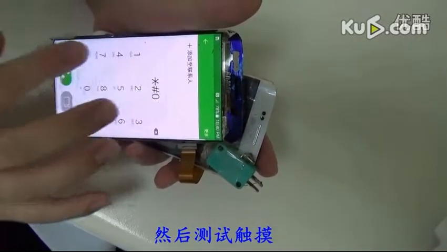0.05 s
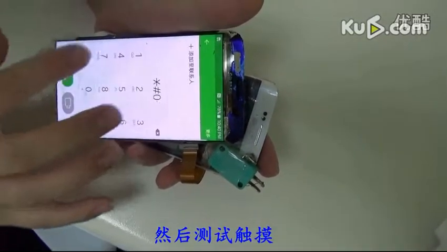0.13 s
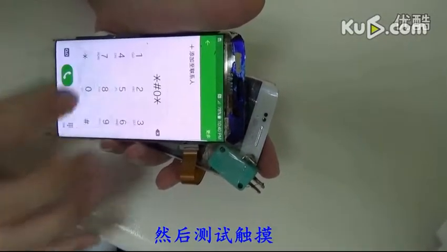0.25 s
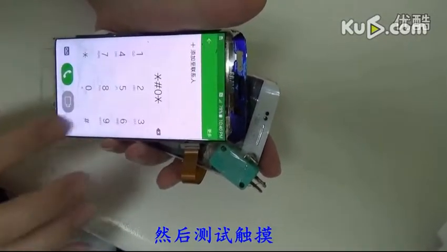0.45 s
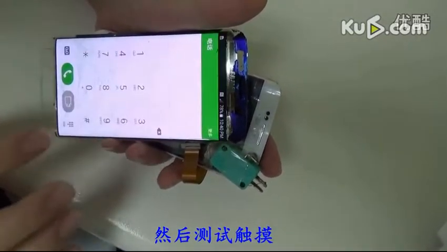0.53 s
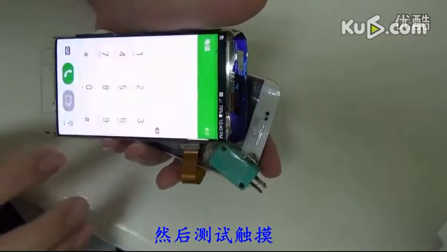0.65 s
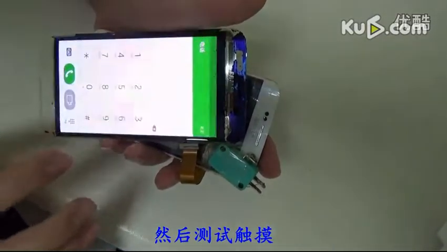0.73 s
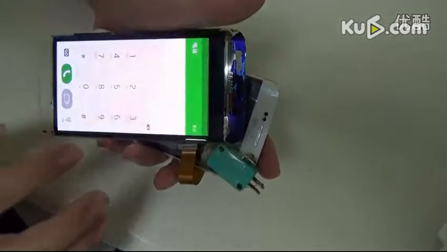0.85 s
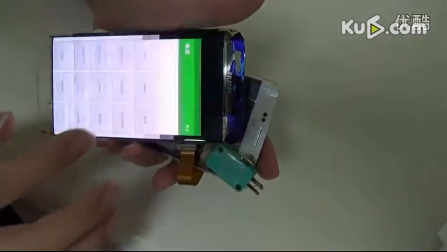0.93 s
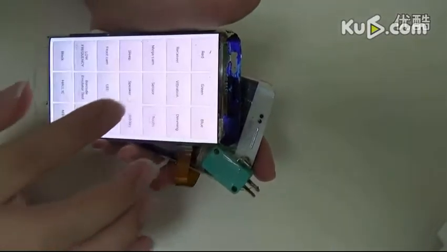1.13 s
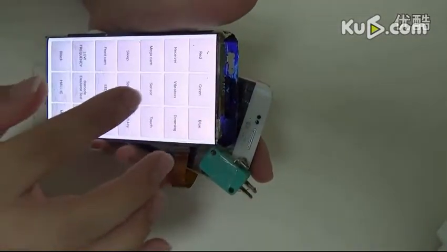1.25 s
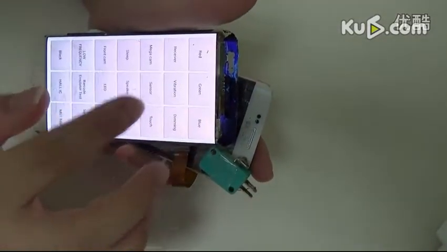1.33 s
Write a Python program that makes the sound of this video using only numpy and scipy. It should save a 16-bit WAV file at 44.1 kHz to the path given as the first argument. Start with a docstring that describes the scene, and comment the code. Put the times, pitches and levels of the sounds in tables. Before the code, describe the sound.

Fingers tap a phone, with a hard knock in a small room over low hiss.

```python
"""Low room noise and hiss run from the start, and now and then skin brushes faintly over a loose phone.
Fingers tap the phone close to the microphone in a small bare room. A light click follows, then a hard
knock and a softer one as the phone rocks and settles. Each contact cracks, shakes the casing, thuds and
leaves the room ringing. After a last tiny tick, the room noise slowly fades."""
import sys
import numpy as np
from scipy import signal
from scipy.fft import rfft, irfft, next_fast_len
from scipy.io import wavfile
from scipy.ndimage import map_coordinates

SR = 44100
rng = np.random.default_rng(int(sys.argv[2]) if len(sys.argv) > 2 else 0)


def wrap_up_sound(samples):
    """Save the sound to the file named by the first command line argument, as 16-bit audio."""
    columns = np.atleast_2d(samples).T
    # keep every value between -1 and 1, then stretch to whole-number steps
    tamed = np.clip(columns, -1, 1)
    steps = np.round(tamed * 32767).astype(np.int16)
    wavfile.write(sys.argv[1], SR, steps)


N = 61739


def contacts():
    """Each contact cracks, rings the casing, thuds and fills the room; the hardest makes the room boom."""
    # Each row: start in seconds, snap in dB, crack in dB, its fade time in seconds, its tilt in dB per
    # octave, pitch in Hz above which it dulls, favoured casing pitch in Hz, focus on that pitch in dB,
    # casing life in seconds, casing in dB, thud in dB, room in dB, room tilt in dB per octave.
    hits = [(0.233, -22, -20, 0.025, 5, 15300, 1550, 23.5, 0.0096, -13, -19.5, -36, -2),
            (0.3207, -27, -23, 0.033, 3.5, 13000, 1520, 11, 0.0094, -25, -31, -41, -1),
            (.3870, 2, -13, 0.052, 0, 13700, 706, 1.5, 0.014, -13, -19.5, -20.5, 0),
            (0.4476, -10, -13.5, 0.027, 0.5, 8900, 1520, 1, 0.0046, -17.5, -37, -28.5, 1),
            (0.759, -58, -35.5, 0.025, 11.5, 20000, 1400, 6, .005, -54, -64, -55, 5)]
    out = np.zeros((2, N))
    for (start, snap_db, crack_db, fade_s, tilt_db, dull_hz,
         favoured_hz, focus_db, life_s, casing_db, thud_db, room_db, room_tilt_db) in hits:
        out += crack(start, snap_db, crack_db, fade_s, tilt_db, dull_hz)
        out += amp(casing_db) * casing(start, favoured_hz, focus_db, life_s)
        out += amp(thud_db) * thud(start)
        out += amp(room_db) * room(start, room_tilt_db)
    hardest_start = max(hits, key=lambda row: row[2])[0]
    return out + amp(-12) * boom(hardest_start)


def crack(start, snap_db, crack_db, fade_s, tilt_db, dull_hz):
    """Glass and plastic parts meet: one sharp snap, then a brief bright chatter."""
    # Each row: pitch in Hz, noise strength in dB.
    spectrum = [(200, -3), (700, 12), (1400, 2.5), (2200, 5), (3500, 5.5), (4800, 0.5), (6200, 1.5),
                (8000, 2.5), (10000, -2), (13000, -5), (15500, -18)]
    t = since(start)
    snap = amp(snap_db) * fade(t, 0.0022)
    chatter = amp(crack_db) * fade(t, fade_s, hold_s=0.00082)
    return noise(spectrum, tilt_db, dull_hz) * rise(t, 0.00031) * (snap + chatter)


def casing(start, favoured_hz, focus_db, life_s):
    """The casing rings briefly, then stops abruptly; the spot that is hit favours some of its tones."""
    # Each row: pitch in Hz, level in dB.
    tones = [(300, 3), (520, -10), (772, 2), (975, -7), (1180, -9), (1345, -8), (1480, -10.5), (2370, -11),
             (3420, -7), (4300, -6)]
    rise_cycles = 1.63
    t = since(start)
    out = np.zeros(N)
    for hz, db in tones:
        level = amp(db - focus_db * np.log2(hz / favoured_hz) ** 2)
        out += level * rise(t, rise_cycles / hz) * tone(t, hz, rough=0.15, rate=600)
    return out * np.exp(-(t / life_s) ** 4)


def thud(start):
    """The phone thuds on its support just after the contact."""
    # Each row: pitch in Hz, level in dB, fade time in seconds.
    tones = [(176, 2, 0.11), (229.4, -5, 0.18), (260, -23, 0.062), (345, -6, 0.13), (412, -10, 0.13),
             (534.6, -8, 0.15), (645, -12.5, 0.33), (878, -10, 0.19), (1264, -8.5, 0.12)]
    t = since(start + 0.004715)
    return ring(t, tones, rough=0.6) * rise(t, 0.004)


def room(start, tilt_db):
    """The walls answer with a wash of sound that holds briefly, then dies; the deep bass lasts longest."""
    # Each row: pitch in Hz, noise strength in dB.
    spectrum = [(60, -29), (120, -43), (180, 1.5), (300, 8), (600, -1.5), (850, 8), (1300, -5), (2000, 1.5),
                (3400, 1.5), (4800, -6), (6500, -0.5), (9500, -11), (13000, -12), (15500, -33)]
    # Each row: pitch in Hz, fade time in seconds.
    fade_times = [(150, 0.85), (400, 0.17), (900, 0.34), (2500, 0.48), (7000, 0.42), (14000, 0.29)]
    # Each row: pitch in Hz, seconds for which the level holds before it fades.
    hold_times = [(150, 0.039), (400, 0.15), (900, 0.098), (2000, 0.0091), (7000, 0.018), (14000, 0.015)]
    hz, t, bands = signal.stft(noise(spectrum, tilt_db), SR, nperseg=256)
    levels = fade(t - start, along(fade_times, hz)[:, None], along(hold_times, hz)[:, None])
    tail = signal.istft(bands * levels, SR, nperseg=256)[1][:, :N]
    return tail * rise(since(start), 0.0055)


def boom(start):
    """The room's own low tones swell and die away after the hard knock."""
    # Each row: pitch in Hz, level in dB, fade time in seconds.
    tones = [(82, -16, .8), (162, 2, .36), (178, 1, .38), (301, 2, .48), (393, 5, .42), (427, -1, .42),
             (544, -4, .42), (753, 0, .36), (786, -4, .33), (965, 3, .35), (1084, -4, .33), (1180, -6, .28),
             (1346, -11, .26)]
    t = since(start)
    return ring(t, tones, rough=0.62) * rise(t, 0.078) ** 2


def brushes():
    """Skin slides on the casing in soft swells of noise."""
    # Each row: time of the peak in seconds, half length in seconds, level in dB.
    strokes = [(0.029, 0.058, -42.5), (0.323, 0.079, -37), (0.685, .055, -43), (0.948, .07, -52.5),
               (1.32, 0.055, -53)]
    # Each row: pitch in Hz, noise strength in dB.
    spectrum = [(1500, 5.5), (4500, -7.5), (6300, 2.5), (8200, 1), (10000, -4), (12000, -0.5), (15500, -15)]
    swells = sum(amp(db) * bump(since(0), peak, half) for peak, half, db in strokes)
    return noise(spectrum) * swells * amp(0.36 * wobble(57.6))


def background():
    """Low room noise with a few wavering tones, and hiss; both slowly fade."""
    # Each row: time in seconds, low noise level in dB, hiss level in dB.
    levels = [(0, -40.5, -45), (.2, -38.5, -46.5), (.6, -37, -47), (.85, -40.5, -50), (1.0, -42.5, -49.5),
              (1.2, -46, -52.5), (1.4, -48, -54.5)]
    # Each row: pitch in Hz, level in dB compared with the low noise.
    tones = [(221, -14.5), (274, -10), (899, -15)]
    # Each row of these two: pitch in Hz, noise strength in dB.
    hum_spectrum = [(15, -38), (25, -21), (43, -8), (70, -10), (123, -5.5), (151, -10.5), (178, 1.5),
                    (238, -7.5), (266, -3), (332, -8.5), (926, -15.5), (1090, -18), (2000, -22.5),
                    (2600, -38), (4400, -120)]
    hiss_spectrum = [(1200, -8), (2000, -3.5), (2600, -0.5), (2900, 0), (3400, -4.5), (4300, -2.5),
                     (5300, -3), (6300, 0.5), (8000, -3.5), (10200, -10.5), (13300, -8), (15500, -19)]
    times, low_db, hiss_db = np.transpose(levels)
    t = since(0)
    drone = sum(amp(db) * unit(tone(t, hz, rough=1.1, rate=18)) for hz, db in tones)
    low = amp(np.interp(t, times, low_db)) * (noise(hum_spectrum) + drone)
    hiss = amp(np.interp(t, times, hiss_db)) * noise(hiss_spectrum)
    return low + hiss


def reflections(x, count=14):
    """Nearby surfaces add weak echoes, mostly in the treble and slightly different left and right."""
    above_hz = 1130
    delays_s = rng.uniform(.001, .022, count)
    gains = amp(-19.5) * (rng.choice([-1, 1], count) + 0.26 * rng.standard_normal((2, count)))

    def response(hz):
        echoes = gains @ np.exp(-2j * np.pi * np.outer(delays_s, hz))
        return 1 + echoes * hz ** 2 / (hz ** 2 + above_hz ** 2)
    return filtered(x, response)


def noise(spectrum, tilt_db=0, dull_hz=np.inf):
    """Nearly mono stereo noise of strength 1, tilted by tilt_db per octave and dulled above dull_hz."""
    # Each row: pitch in Hz, level in dB of the side (opposite in the two ears) against the shared middle.
    width = [(60, -17), (150, -37), (300, -17.5), (600, -15.5), (1200, -17.5), (5000, -16), (9000, -22),
             (13000, -57)]

    def response(hz):
        colour = amp(along(spectrum, hz) + tilt_db * np.log2(np.maximum(hz, 100)))
        dulling = np.sqrt(1 + (hz / dull_hz) ** 8)
        return colour / dulling * amp(np.outer([0, 1], along(width, hz)))
    mid, side = filtered(rng.standard_normal((2, N)), response)
    return unit(np.array([mid + side, mid - side]))


def ring(t, tones, rough):
    """Slightly unsteady tones, each dying at its own speed."""
    return sum(amp(db) * fade(t, fade_s) * tone(t, hz, rough, rate=40.46) for hz, db, fade_s in tones)


def tone(t, hz, rough, rate):
    """A sine wave pushed back and forth at random by about rough radians."""
    return np.sin(2 * np.pi * hz * t + rough * wobble(rate))


def wobble(rate):
    """A smooth curve through rate random points a second."""
    return map_coordinates(rng.standard_normal(int(N * rate / SR) + 4), [np.arange(N) * rate / SR])


def rise(t, rise_s):
    """A soft start from 0, about two thirds of the way to 1 after rise_s seconds."""
    return 1 - np.exp(-t / rise_s)


def fade(t, fade_s, hold_s=0):
    """Stays at 1 for hold_s seconds, then falls 60 dB in each fade time of fade_s seconds."""
    return amp(-60 * np.maximum(t - hold_s, 0) / fade_s)


def bump(x, centre, width):
    return np.exp(-.5 * ((x - centre) / width) ** 2)


def since(start):
    """Seconds since start, zero before it."""
    return np.maximum(np.arange(N) / SR - start, 0)


def amp(db):
    return 10 ** (np.asarray(db) / 20)


def unit(x):
    """Scales x to an average strength (rms) of 1."""
    return x / np.sqrt(np.mean(x ** 2) + 1e-20)


def along(points, hz):
    """Reads between rows of pitch and value, with octaves evenly spaced."""
    pitches, values = np.transpose(points)
    return np.interp(np.log(hz + 1), np.log(pitches + 1), values)


def filtered(x, response):
    """Multiplies each frequency in x by response(hz)."""
    size = next_fast_len(N + SR // 2)
    return irfft(rfft(x, size) * response(np.fft.rfftfreq(size, 1 / SR)), size)[..., :N]


def scene():
    """All sources with their echoes, leaning a little to the left."""
    # Each row: pitch in Hz, lift of the left and cut of the right in dB.
    lean = [(70, -0.5), (170, 1.1), (350, 0.4), (700, 0.14), (2500, 0.2), (8000, 0)]
    mix = reflections(contacts() + brushes() + background())
    return filtered(mix, lambda hz: amp(np.outer([1, -1], along(lean, hz))))


def record(dry):
    """Close reflections colour all that the microphone hears, and the highest treble is cut off."""
    # Each row: pitch in Hz, width in Hz, boost or cut in dB.
    peaks_and_dips = [(1890, 30, -6), (2350, 330, -0.5), (2822, 36, -12.5), (3150, 480, -2),
                      (3825, 17, -19), (4290, 79, -3), (4770, 96, -4.5), (5360, 66, 3), (7220, 35, -15)]
    top_hz, edge_hz = 15450, 130

    def response(hz):
        colour = amp(sum(db * bump(hz, centre, width) for centre, width, db in peaks_and_dips))
        return colour * (.5 - .5 * np.tanh((hz - top_hz) / edge_hz))
    return filtered(dry, response)


dry = scene()
out = record(dry)
wrap_up_sound(out)
```